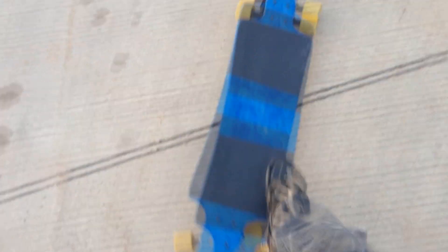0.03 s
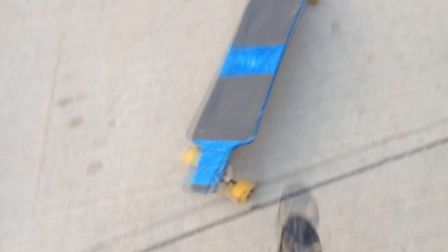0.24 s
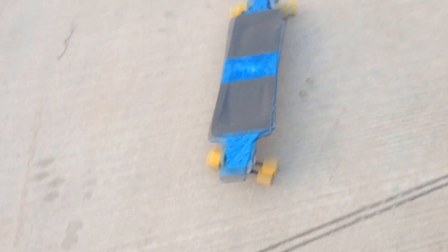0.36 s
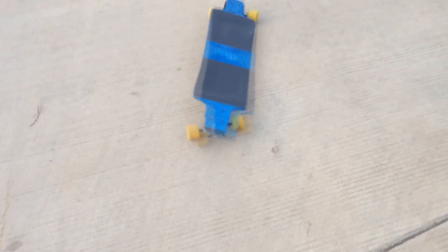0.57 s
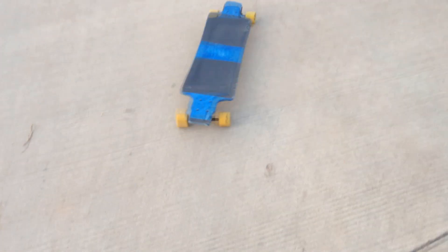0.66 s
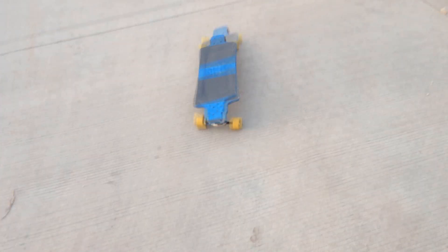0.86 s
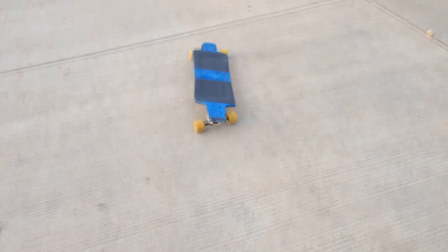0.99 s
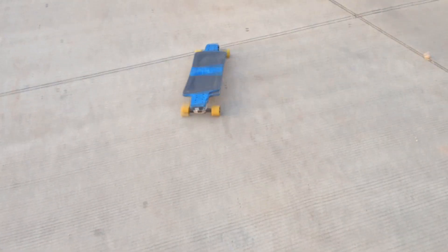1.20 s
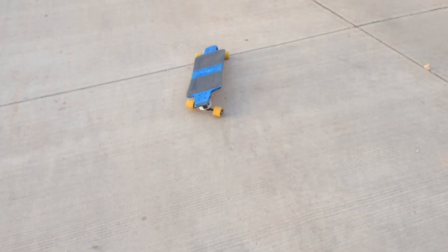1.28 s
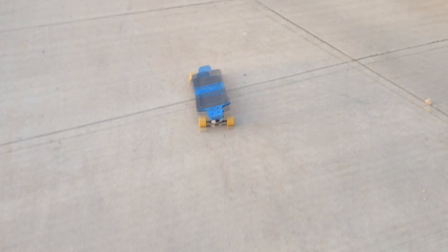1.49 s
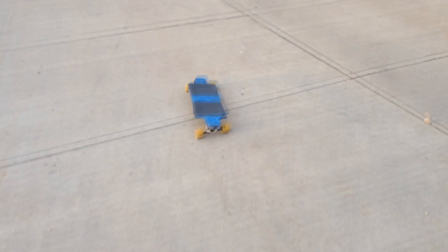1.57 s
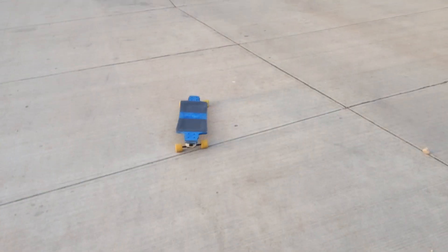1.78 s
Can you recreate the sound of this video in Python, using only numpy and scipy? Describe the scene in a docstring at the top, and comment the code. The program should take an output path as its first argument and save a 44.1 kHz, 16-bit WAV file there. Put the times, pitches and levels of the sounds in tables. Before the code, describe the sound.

Empty skateboard rattles away across rough concrete after a short shoe scrape.

```python
"""A longboard with no rider is shoved off and rolls away over brushed concrete, outdoors.
The push brings low thuds, the scrape of a shoe and a groan of rubber sticking and slipping.
With no weight on it, the board rattles: each bump knocks the wooden deck and jingles the trucks
(the metal axle mounts), while the wheels grind over fine grooves and snap bits of grit.
Near the end the rattle dies down to light ticks."""
import sys
import numpy as np
from scipy import signal
from scipy.fft import rfft, irfft
from scipy.io import wavfile
from scipy.ndimage import uniform_filter1d, minimum_filter1d

SR = 44100
rng = np.random.default_rng(int(sys.argv[2]) if len(sys.argv) > 2 else 0)


def to_wav(s):
    """Save 16-bit WAV."""
    ch = np.atleast_2d(s).T  # columns
    pcm = np.round(np.clip(ch, -1, 1) * 32767)  # PCM
    wavfile.write(sys.argv[1], SR, pcm.astype(np.int16))


N = 81585
BLOW_SAMPLES = 6144

# Tone colour of the trucks. Each row: frequency in Hz, relative level in dB.
TRUCK_COLOUR = [(300, -43), (1500, 6), (2400, 3), (2950, -6.5), (3400, 0), (4300, -2), (4750, -5),
                (5500, -8.5), (7000, -27), (10000, -35), (15000, -62)]
# Ringing notes of the trucks. Each row: frequency in Hz, width in Hz, near and far strength in dB.
TRUCK_NOTES = [(3114, 77, 11.5, 1), (3296, 110, 12, 8.5), (3752, 210, 4.5, 7), (4066, 64, 6.5, 9),
               (5210, 160, 7.5, 4.5)]
# Tone colour of the thin, high crack. Each row: frequency in Hz, relative level in dB.
CRACK_COLOUR = [(1000, -40), (4000, -10), (6300, 6), (7600, 1), (9500, -10.5), (12000, -15), (15500, -39)]


def undb(db):
    """Turn decibels into a gain."""
    return 10 ** (np.asarray(db) / 20)


def unit(x):
    """Scale a signal to an average (rms) level of 1."""
    return x / np.sqrt(np.mean(x ** 2))


def add(out, start_s, x):
    """Mix a sound in at its start time."""
    i = max(int(start_s * SR), 0)
    out[i:i + len(x)] += x[:max(N - i, 0)]


def body(colour, notes=(), far=0):
    """How an object answers one sharp tap: a broad tone colour with ringing notes standing out."""
    freqs = np.maximum(np.fft.rfftfreq(BLOW_SAMPLES, 1 / SR), 1)
    hz, db = np.array(colour).T
    power = np.ones(len(freqs))
    for centre, width, near_db, far_db in notes:
        power += undb(near_db + far * (far_db - near_db)) ** 2 / (1 + (2 * (freqs - centre) / width) ** 2)
    spectrum = undb(np.interp(np.log(freqs), np.log(hz), db)) * np.sqrt(power)
    # Make the spectrum into a sound that starts at once and dies away (minimum phase).
    half = BLOW_SAMPLES // 2
    cepstrum = irfft(np.log(spectrum))[:half]
    return irfft(np.exp(rfft(2 * cepstrum, BLOW_SAMPLES)))[:half]


def ring(force, response):
    """Shake an object with a force; the sound comes out at an average level of 1."""
    return unit(signal.fftconvolve(force, response)[:len(force)])


def blow(response, chatter_s, chatter_db):
    """One hit rings an object: a sharp contact, a chatter of loose parts and a faint tail."""
    t = np.arange(BLOW_SAMPLES) / SR
    contact_s, tail_s, tail_db = 0.001, 0.15, -14.5
    chatter, tail = rng.standard_normal((2, BLOW_SAMPLES)) * (1 - np.exp(-t / contact_s))
    force = undb(chatter_db) * unit(chatter * undb(-60 * t / chatter_s))
    force += undb(tail_db) * unit(tail * undb(-60 * t / tail_s))
    force[int(contact_s * SR)] += np.sqrt(BLOW_SAMPLES)
    lag = 1 + int(rng.random() * 0.002 * SR)  # the concrete reflects the sound up to 2 ms later
    reflection = undb(-11) * np.pad(force, (lag, 0))[:BLOW_SAMPLES]
    return ring(force + reflection, response) * np.sqrt(0.012 * SR / BLOW_SAMPLES)


def farness(t):
    """0 while the board is close, rising to 1 once it is some way off."""
    near_s, far_s = 0.68, 1.006
    return np.clip((t - near_s) / (far_s - near_s), 0, 1)


def deck_states():
    """How the deck answers a tap: damped by the foot, free and near, free and far."""
    # Tone colours of those three states. Each row: frequency in Hz, relative level in dB.
    held = [(40, -82), (160, -24), (300, -11.5), (450, -6), (600, -9), (800, -6), (950, 3.5), (1140, -2.5),
            (1350, 3), (1580, 4), (1760, -4.5), (2150, -1.5), (2350, -15), (2470, -4), (2800, -23),
            (4500, -32), (9000, -55)]
    near = [(40, -61), (160, -35.5), (350, -19), (520, -21), (660, -11), (780, -11), (1150, -1.5),
            (1450, 0), (1700, -13), (1950, -9), (2300, -9), (2750, -16), (4500, -67), (9000, -60)]
    distant = [(40, -55), (160, -32.5), (300, -31), (470, -28), (600, -23), (700, -15), (930, -8),
               (1220, -2), (1400, -5.5), (1550, -2), (1880, -2), (2100, -14.5), (2350, -13), (2900, -24.5),
               (4500, -53), (9000, -76)]
    # Ringing notes of the wood. Each row: frequency in Hz, width in Hz, near and far strength in dB.
    notes = [(687.8, 21.4, 11.5, 7.5), (854.4, 25.5, 16, 10.5), (1089, 58, 8.5, 7), (1287.5, 39, 11.5, 8),
             (1544, 54, -6, 9), (1758, 51, -16, 6.5), (1920, 50, 10, 1.5), (2258, 47, 10, 0.5),
             (2470, 32, -14, -13), (2730, 66, 5.5, 1)]
    return np.array([body(held), body(near, notes) / 2, body(distant, notes, far=0.87) / 2])


def deck_blend(t):
    """The share of each deck state as the foot lets go and the board draws away."""
    release_s, release_length_s = 0.427, 0.048
    free = np.clip((t - release_s) / release_length_s, 0, 1)
    return np.array([1 - free, free * (1 - farness(t)), free * farness(t)])


def background(t):
    """Quiet open air, and a thin high hiss that fades before the push."""
    # Tone colours of the hiss and the air. Each row: frequency in Hz, relative level in dB.
    hiss_colour = [(2000, -30), (3100, -24), (3700, 0.5), (4000, -12), (4350, 3), (4700, -11), (5200, 2.5),
                   (5650, -5), (6300, -13), (7500, -12), (10000, -24), (15000, -38)]
    air_colour = [(20, -34), (55, -4.5), (110, -3), (250, -5.5), (450, -13.5), (1000, -3), (2000, -19),
                  (3000, -22.5), (4000, -17.5), (7000, -29), (15000, -35)]
    hiss_db = -47 - 193 * np.maximum(t - 0.04, 0)
    hiss = ring(rng.standard_normal(N), body(hiss_colour))
    air = ring(rng.standard_normal(N), body(air_colour))
    return undb(hiss_db) * hiss + undb(-52.5) * air


def grains(per_s, spread_db, smooth_db):
    """The force from a rough surface: tiny random hits of uneven size over smooth noise."""
    size = undb(spread_db * np.minimum(rng.exponential(size=N), 4))
    hits = (rng.random(N) < per_s / SR) * size * rng.choice([-1, 1], N)
    return unit(hits) + undb(smooth_db) * rng.standard_normal(N)


def wheels(t):
    """Rolling over rough concrete shakes the deck and trucks in uneven spurts, over a low rumble."""
    # Loudness of the rolling. Each row: time in seconds, grinding level in dB, rumble level in dB.
    roll_levels = [(0, -68, -57), (.16, -55, -44.5), (0.212, -38.5, -35.5), (.25, -33, -38.5),
                   (.42, -26.5, -40.5), (.45, -32.5, -37), (.49, -31.5, -46), (.55, -32.5, -38.5),
                   (.64, -19, -40), (.71, -26, -44), (.76, -19, -41.5), (.82, -25, -47.5),
                   (0.879, -19.5, -45.5), (.945, -34.5, -43), (1.01, -18.5, -42.5), (1.10, -29, -49.5),
                   (1.221, -24.5, -46), (1.28, -37, -71), (1.381, -28, -55), (1.439, -39, -55.5),
                   (1.50, -22, -51), (1.67, -38, -63.5), (1.72, -48, -67), (1.85, -48, -64)]
    # Tone colour of the rumble. Each row: frequency in Hz, relative level in dB.
    rumble_colour = [(20, -24), (100, -15.5), (160, -2), (340, -1), (480, -1), (800, -5.5), (2000, -40),
                     (8000, -59)]
    times, grind_db, rumble_db = np.array(roll_levels).T
    wobble = uniform_filter1d(uniform_filter1d(rng.standard_normal(N), size=260), size=260)
    spurts = undb(1.5 * unit(wobble))
    coarse = spurts * grains(per_s=1000, spread_db=3, smooth_db=-8.5)
    fine = spurts * grains(per_s=2500, spread_db=4.5, smooth_db=-10.5)
    deck = sum(share * ring(coarse, state) for share, state in zip(deck_blend(t), deck_states()))
    trucks = undb(-10) * ring(fine, body(TRUCK_COLOUR, TRUCK_NOTES, far=0.17))
    crackle = undb(-25.5) * ring(fine, body(CRACK_COLOUR))
    treble_fade = undb(-11 * np.maximum(t - 0.7, 0))  # duller as the board rolls away
    grind = deck + (trucks + crackle) * treble_fade
    rumble = ring(rng.standard_normal(N), body(rumble_colour))
    return undb(np.interp(t, times, grind_db)) * grind + undb(np.interp(t, times, rumble_db)) * rumble


def blows(events, colour, gain_db, chatter_s, chatter_db):
    """A series of hits that share one tone colour."""
    out, response = np.zeros(N), body(colour)
    for start, db in events:
        add(out, start, undb(db + gain_db) * blow(response, chatter_s, chatter_db))
    return out


def thuds():
    """The shoe and the deck give low, dull thuds."""
    # The thuds. Each row: start in seconds, relative level in dB.
    hits = [(0.123, -30.5), (0.132, -25.5), (0.155, -25.5), (0.183, -24), (0.742, -30), (0.954, -25),
            (1.008, -27.5)]
    # Their tone colour. Each row: frequency in Hz, relative level in dB.
    colour = [(20, -40), (90, -25), (170, -7), (330, 0.5), (520, -8), (1000, -26), (3000, -50), (7000, -40),
              (15000, -67)]
    return blows(hits, colour, gain_db=-8, chatter_s=0.046, chatter_db=4)


def shoe_scrape(t):
    """A shoe sole scrapes as it pushes the board off, louder the harder it presses."""
    # Tone colour of the scrape. Each row: frequency in Hz, relative level in dB.
    colour = [(60, -31), (170, -23), (400, -9.5), (950, 4.5), (1550, -2.5), (1800, -7.5), (2250, 4),
              (2900, -11), (3500, 1), (5000, -8), (8000, -23), (11000, -30), (15000, -41)]
    pressure = np.interp(t, [0.15, 0.26, 0.403, 0.52], [0, 1, 1, 0])
    scrape = ring(grains(per_s=1300, spread_db=5, smooth_db=-3), body(colour))
    return np.sqrt(pressure) * undb(-26.5 - 20 * (1 - pressure)) * scrape


def rubber_groan(t):
    """Rubber sticks and slips during the push, making a rough, gliding low tone."""
    # The path of the groan. Each row: time in seconds, pitch in Hz, level in dB.
    glide = [(.20, 464.6, -38), (0.259, 559, -27.5), (0.308, 521, -31.5), (.345, 440, -36),
             (0.371, 350, -28), (0.391, 311.6, -39), (.41, 391, -25.5), (.43, 457.8, -34.5),
             (0.459, 460, -59)]
    times, hz, db = np.array(glide).T
    harmonics_db, roughness, flutter_db = [-4, 0.5, -6, -31], 0.1012, 1.9
    jitter, flutter = (unit(uniform_filter1d(rng.standard_normal(N), size=140)) for _ in range(2))
    pitch_hz = np.interp(t, times, hz) * (1 + roughness * jitter)
    phase = 2 * np.pi * np.cumsum(pitch_hz) / SR
    tone = sum(undb(level) * np.sin(k * phase) for k, level in enumerate(harmonics_db, 1))
    return unit(tone * undb(flutter_db * flutter)) * np.interp(t, times, undb(db), left=0, right=0)


def rattle():
    """Each bump knocks the deck and jingles the trucks, with a thin crack on top."""
    # The bumps. Each row: start in seconds, then relative levels in dB of deck, trucks and crack.
    bumps = [(0.202, -29.5, -40, -46), (0.241, -19, -33, -44), (0.25, -26, -26.5, -35),
             (0.261, -18, -28.5, -33), (0.278, -26, -49, -56), (0.29, -21, -34, -38),
             (0.301, -20.5, -41, -36.5), (0.3366, -16, -19.5, -38), (0.342, -28, -18, -32),
             (0.367, -17.5, -17.5, -40), (0.375, -25, -34, -35), (0.404, -31, -19.5, -37),
             (0.413, -24.5, -31, -52), (0.472, -26, -36, -67), (0.487, -26.5, -30.5, -70),
             (0.5125, -21.5, -20.5, -40.5), (0.523, -19.5, -55, -58), (0.544, -20, -21, -38),
             (0.5793, -13.5, -20, -63), (0.586, -15.5, -29, -48), (0.592, -26, -28, -38),
             (0.617, -9, -23, -34), (0.628, -16, -19.5, -32.5), (0.64, -16, -24, -35),
             (0.659, -35, -22.5, -41), (0.673, -13, -27, -44), (0.688, -27, -31, -47),
             (0.72, -21.5, -33, -65), (0.732, -19, -26, -56), (0.743, -17, -27, -43),
             (0.764, -19, -27, -41), (0.776, -16, -28.5, -51), (0.831, -21, -25.5, -39.5),
             (0.856, -16, -26, -49), (0.868, -18.5, -36, -59), (0.897, -22.5, -30, -49),
             (0.908, -24, -35, -45), (0.928, -25.5, -62, -72), (0.954, -22.5, -28, -49),
             (0.9661, -13.5, -27, -43.5), (0.985, -16, -34, -60), (0.999, -18.5, -37, -45),
             (1.0074, -12, -23, -41), (1.0146, -14.5, -22, -34), (1.019, -12.5, -34, -50),
             (1.036, -27.5, -41, -51), (1.053, -24, -29, -44), (1.066, -14.5, -22.5, -38),
             (1.104, -17.5, -33, -53), (1.1462, -12.5, -24, -32), (1.154, -26.5, -33, -53),
             (1.182, -27.5, -41, -46), (1.197, -21.5, -36.5, -48), (1.205, -22, -36, -42),
             (1.228, -25, -32.5, -41.5), (1.239, -22.5, -49, -65), (1.298, -20.5, -46.5, -54.5),
             (1.343, -20, -38, -68), (1.367, -54, -58, -55), (1.395, -19.5, -31, -53),
             (1.413, -23, -40.5, -63), (1.46, -24, -38.5, -71), (1.479, -19, -33, -50),
             (1.491, -12.5, -21.5, -34.5), (1.51, -19.5, -32.5, -50), (1.527, -34, -62, -72),
             (1.558, -17.5, -33, -57), (1.584, -22, -39.5, -58), (1.598, -43, -43, -69),
             (1.619, -30.5, -44.5, -67), (1.632, -31, -49, -71), (1.651, -25, -39, -79),
             (1.682, -30, -46.5, -78), (1.74, -42.5, -50.5, -84), (1.757, -39, -55, -76)]
    out, decks, crack = np.zeros(N), deck_states(), body(CRACK_COLOUR)
    near_truck, far_truck = (body(TRUCK_COLOUR, TRUCK_NOTES, far) for far in (0, 1))
    for start, deck_db, truck_db, crack_db in bumps:
        deck = deck_blend(start) @ decks
        truck = near_truck + farness(start) * (far_truck - near_truck)
        add(out, start, undb(deck_db + 0.06) * blow(deck, chatter_s=0.046, chatter_db=4))
        add(out, start, undb(truck_db + 1) * blow(truck, chatter_s=0.052, chatter_db=6))
        add(out, start, undb(crack_db - 1.5) * blow(crack, chatter_s=0.06, chatter_db=2.5))
    return out


def grit():
    """Bits of grit snap under a wheel with a short, bright crunch."""
    # The snaps. Each row: start in seconds, relative level in dB.
    snaps = [(0.249, -16), (0.2624, -23), (0.3404, -18), (0.5446, -23), (0.628, -20), (0.8315, -24),
             (1.0734, -18.5), (1.1429, -14.5), (1.3773, -28.5), (1.488, -19.5)]
    # Their tone colour. Each row: frequency in Hz, relative level in dB.
    colour = [(200, -45), (2000, -17), (4000, 8.5), (7500, 0.5), (10000, -9), (15500, -27)]
    return blows(snaps, colour, gain_db=-15, chatter_s=0.026, chatter_db=1)


def scene():
    """Mix the open air, the push and the rolling board into one channel."""
    t = np.arange(N) / SR
    sustained = background(t) + wheels(t) + shoe_scrape(t) + rubber_groan(t)
    return (sustained + grit() + thuds() + rattle())[None]


def record(dry):
    """A quick limiter turns down the highest peaks, and the very top of the treble is cut."""
    ceiling, top_hz = 0.95, 15700
    needed_gain = ceiling / np.maximum(np.abs(dry), ceiling)
    smooth_gain = uniform_filter1d(minimum_filter1d(needed_gain, size=200), size=200)
    treble_cut = signal.ellip(8, 0.2, 70, top_hz, fs=SR, output="sos")
    return signal.sosfilt(treble_cut, dry * smooth_gain)


dry = scene()
out = record(dry)
to_wav(out)
```